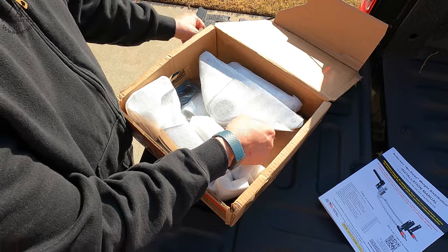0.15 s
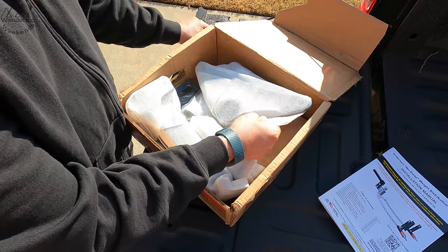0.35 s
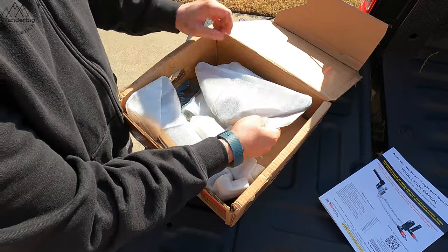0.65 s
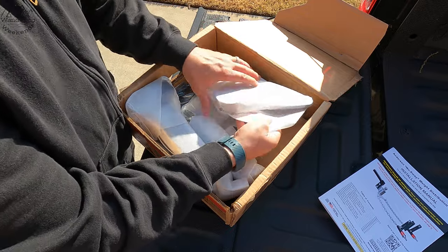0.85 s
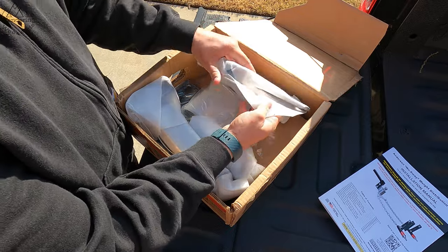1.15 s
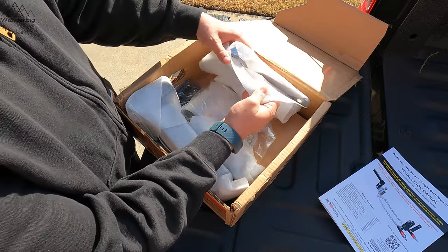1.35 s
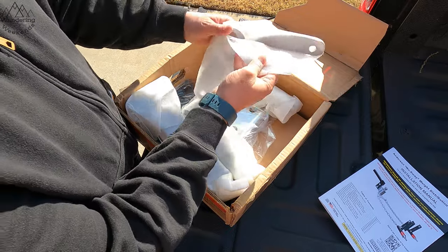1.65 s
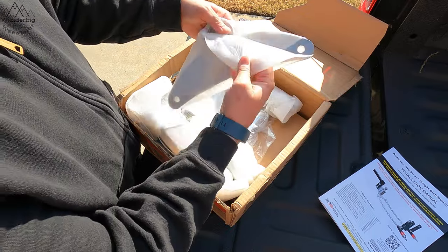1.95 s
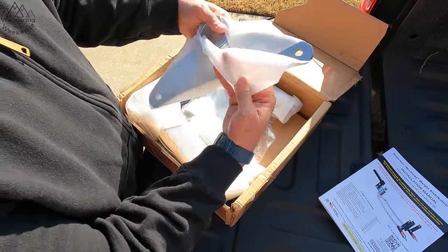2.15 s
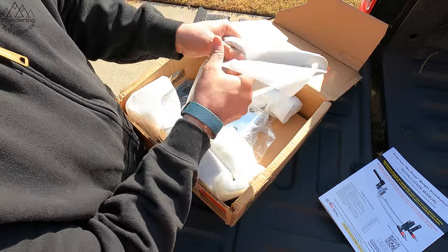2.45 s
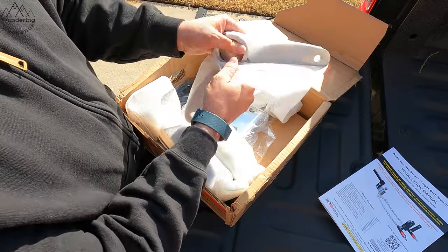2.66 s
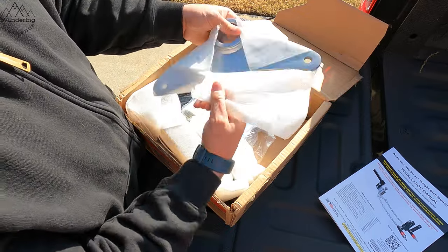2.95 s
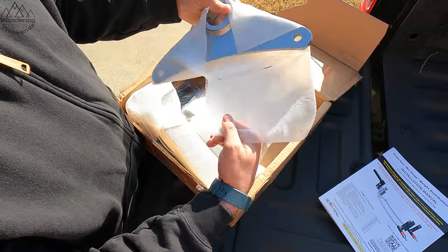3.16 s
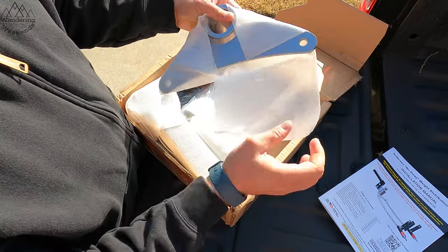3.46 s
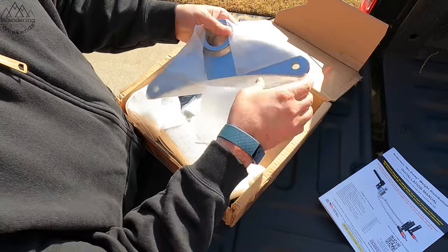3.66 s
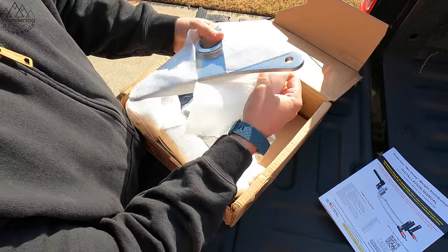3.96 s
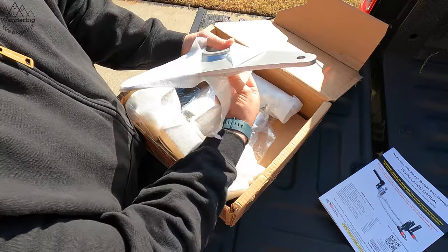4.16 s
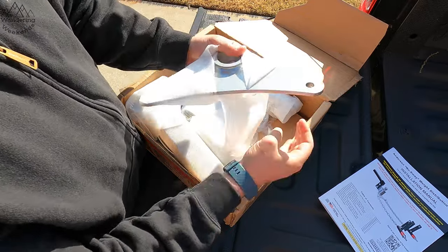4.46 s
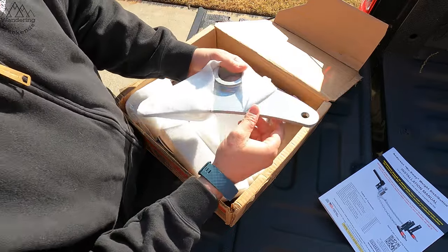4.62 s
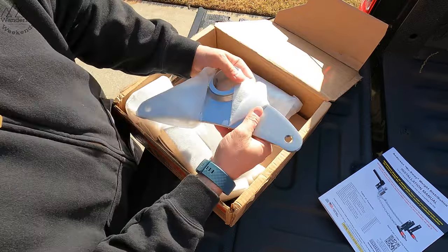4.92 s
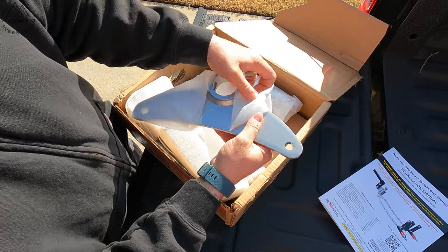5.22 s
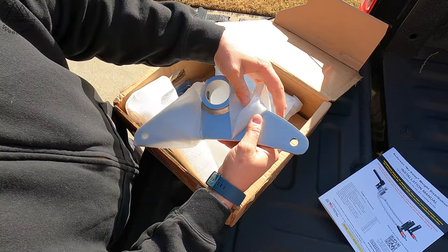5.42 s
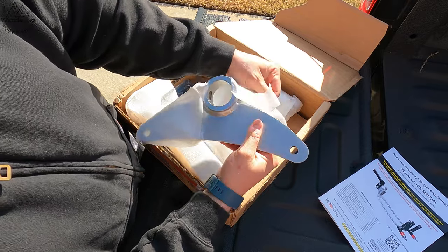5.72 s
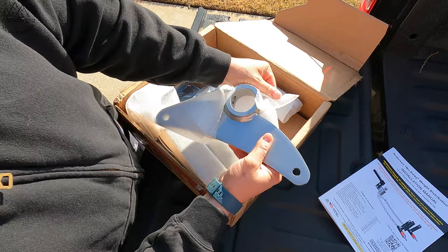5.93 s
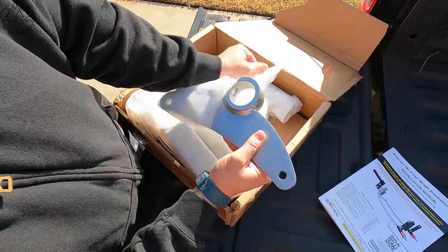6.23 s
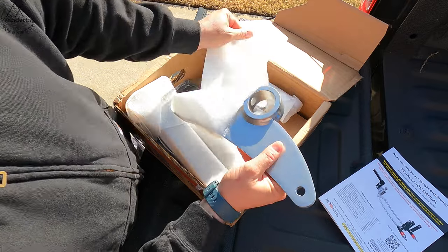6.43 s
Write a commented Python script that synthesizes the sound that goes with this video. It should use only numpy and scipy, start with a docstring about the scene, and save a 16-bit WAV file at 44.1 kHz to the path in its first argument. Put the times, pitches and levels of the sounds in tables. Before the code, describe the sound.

Close, dry crinkling of packing sheet, sharp little snaps and short scraping pulls, a few dull box bumps, faint outdoor air beneath.

```python
"""Unwrapping a steel bracket

Hands lift a steel bracket out of a cardboard box outdoors and peel off its thin packing wrap, up close.
Creases snap as single pulses, pulls are stick-slip pulse trains, and sparser noise rustles in between.
The box thumps in damped modes, the crackle faintly rings the steel, and shaped noise is the moving air.
A camera microphone colours it all and adds a short hollow doubling."""
import sys
import numpy as np
from scipy import signal
from scipy.fft import rfft, irfft, next_fast_len
from scipy.io import wavfile
from scipy.ndimage import uniform_filter1d, minimum_filter1d, map_coordinates

SR = 44100
rng = np.random.default_rng(int(sys.argv[2]) if len(sys.argv) > 2 else 0)


def generate_wav(sig):
    """Save sig (samples, or channels by samples) to the path in sys.argv[1] as 16-bit PCM at SR."""
    pcm = np.round(np.clip(np.atleast_2d(sig).T, -1, 1) * 32767).astype(np.int16)
    wavfile.write(sys.argv[1], SR, pcm)


N = 290442  # length in samples

# a crease strains just before it buckles: lead time, and level against the pop's sharp pulse
STRAIN_S, STRAIN_DB = 0.0034, -18.5

# the loudest creases popping; levels are relative
# columns: start_s [s], level_db [dB], fold_hz [Hz]
CREASE_SNAPS = [(0.088, -25.5, 2150), (0.2168, -23, 2870), (0.392, -26.5, 2420), (.48, -28.5, 2770),
                (0.7823, -27.5, 1560), (0.8429, -21.5, 3080), (0.8695, -30, 2830), (0.8832, -28, 3070),
                (0.9808, -24.5, 2620), (.9988, -22, 2240), (1.0057, -19.5, 2400), (1.1144, -22, 2180),
                (1.1432, -26, 1560), (1.161, -29.5, 1820), (1.208, -28.5, 2940), (1.4645, -17, 3750),
                (1.51, -32.5, 1780), (1.676, -22.5, 2470), (1.7206, -19, 2410), (1.7738, -29.5, 1770),
                (1.8261, -27, 2620), (1.872, -26, 1440), (1.896, -23.5, 1640), (1.917, -19.5, 1940),
                (2.0217, -18.5, 2970), (2.051, -23, 1700), (2.0739, -24.5, 1560), (2.0948, -14.5, 1580),
                (2.143, -16.5, 1500), (2.161, -23.5, 2360), (2.215, -28, 1790), (2.343, -24.5, 1630),
                (2.598, -18.5, 1790), (2.67, -34.5, 1790), (2.791, -26, 2390), (2.833, -27, 1880),
                (2.936, -19, 2060), (3.039, -17.5, 1930), (3.1042, -24, 2800), (3.181, -19, 2740),
                (3.29, -36.5, 2610), (3.3479, -20, 2280), (3.381, -24.5, 1970), (3.4138, -28.5, 1930),
                (3.452, -23, 2250), (3.538, -26, 2200), (3.555, -21.5, 2790), (3.7737, -31.5, 2320),
                (3.8367, -19.5, 2180), (3.8844, -37, 1570), (3.908, -24.5, 2150), (3.9444, -24, 2320),
                (3.957, -24, 3000), (3.9879, -21.5, 2690), (4.041, -23.5, 4230), (4.0541, -21, 2330),
                (4.196, -22, 1680), (4.211, -19, 1650), (4.309, -21.5, 1950), (4.3656, -31.5, 3370),
                (4.487, -28, 2470), (4.543, -28, 3420), (4.705, -26.5, 3000), (4.7216, -27, 1800),
                (4.7328, -35, 2920), (4.7577, -22.5, 2900), (4.784, -27, 2600), (4.7987, -23, 2760),
                (4.851, -25, 2550), (4.9717, -24, 3150), (5.0265, -30.5, 3770), (5.081, -36, 2160),
                (5.104, -26, 2120), (5.123, -20.5, 2500), (5.238, -29.5, 2730), (5.2524, -34, 1960),
                (5.3777, -22, 2720), (5.565, -32.5, 2110), (5.6574, -24, 2120), (5.6864, -11.5, 3040),
                (5.705, -22.5, 2810), (5.734, -21, 3400), (5.7547, -23, 3400), (5.7645, -21, 3520),
                (5.7987, -17.5, 3200), (5.929, -18, 2620), (5.947, -21, 2296), (5.978, -21.5, 1580),
                (6.1146, -11.5, 1790), (6.257, -24.5, 2010), (6.3394, -16, 1900), (6.402, -22, 2270),
                (6.4496, -14.5, 3430), (6.579, -29, 2130)]


def snaps():
    """The big creases give way one by one."""
    track = np.zeros(N)
    for start_s, level_db, fold_hz in CREASE_SNAPS:
        add(track, start_s - STRAIN_S, pop(level_db, fold_hz))
    return track


def pop(level_db, fold_hz, body_db=-16.5, body_scatter_db=2.0, size=2048):
    """A crease buckles in one pulse, and the sheet around it shivers briefly."""
    buckle = amp(-2.5) * dying_noise(0.017, size)
    buckle[0] += 1
    strain = rng.standard_normal(round(STRAIN_S * SR))
    strain *= amp(STRAIN_DB) / np.linalg.norm(strain)
    push = np.concatenate([strain, buckle])
    shaped = np.convolve(push, facets(1, depth_db=3.0)[0])
    this_body_db = rng.normal(body_db, body_scatter_db)
    sound = sheet(shaped, fold_hz, q=2.2, body_db=this_body_db, hiss_db=-20.5)
    return amp(level_db + 20.5) * sound / np.linalg.norm(sound)


# a tauter sheet has less body and a sharper fold: Q at ordinary slack, the body level there,
# and how many dB less body doubles the Q
FOLD_Q, SLACK_DB, DB_PER_Q_DOUBLING = 1.93, -13, 20.5

# pulls on the wrap; swell is the level change from start to end, slips_per_s a nominal rate,
# body and hiss are the sheet's low and high bands against the fold
# columns: start_s [s], end_s [s], level_db [dB], swell_db [dB], slips_per_s [1/s], fold_hz [Hz],
# body_db [dB], hiss_db [dB]
WRAP_PULLS = [(0.023, 0.035, -38, 8, 245, 1500, 0, -19), (0.052, 0.093, -33, 7, 600, 2220, -1, -36),
              (0.211, 0.247, -28, 5, 270, 2920, -1, -9.5), (.246, .342, -33.5, -4, 300, 3900, 2, -12.5),
              (0.339, 0.413, -28, 1, 600, 2860, 5, -8.5), (0.413, .464, -30.5, -8, 590, 1120, -3, -11),
              (.95, 1.0, -34.5, 2, 180, 1800, -6, -4), (0.999, 1.074, -31, -10, 160, 2400, -9, -15),
              (1.144, 1.252, -36.5, 1, 160, 2460, -9, -5.5), (1.343, 1.425, -36.5, -1, 330, 1880, -12, 3),
              (1.425, 1.471, -24, 1.5, 308, 1610, -3, -6), (1.546, 1.642, -32.5, 9, 290, 1640, -6, -8.5),
              (1.663, 1.693, -32.5, 6, 410, 1900, 2, -1), (1.82, 1.832, -24, -13, 520, 2337, -1.5, -10),
              (1.88, 1.955, -31, -11, 158, 1880, -14, -2), (2.058, 2.115, -26, -6, 500, 1560, -6.5, -18),
              (2.116, 2.187, -32, -5, 430, 1840, 1.5, -8), (2.345, 2.421, -32, 19, 386, 2080, -12, -9.5),
              (2.789, 2.82, -24.5, -4, 190, 2300, -30, -16), (2.814, 2.851, -23, 0, 155, 1920, -34, -18),
              (2.849, 2.953, -23, -8.5, 200, 1830, -30, -18),
              (3.004, 3.064, -27.5, 1, 800, 1937, -8, -12.5), (3.064, 3.129, -31.5, 2, 226, 2520, -3, -11),
              (3.125, 3.203, -28.5, -4, 400, 2480, -4.5, -15),
              (3.314, 3.466, -36, 5, 137, 2540, -21, -15.5), (3.815, 3.845, -30.5, 3, 270, 2127, 1.5, -17),
              (3.881, 3.918, -35.5, -11, 145, 1890, 2, -37), (3.942, 4.006, -33.5, 12, 167, 2504, 6.5, -37),
              (4.021, 4.113, -29.5, 11.5, 165, 2280, -2, -38),
              (4.11, 4.169, -22.5, 3, 1080, 1570, -17, -11.5),
              (4.198, 4.254, -22.5, 3, 390, 1680, -10.5, -8.5),
              (4.261, 4.292, -21, -11, 1550, 1910, -25, -16.5), (4.281, 4.326, -31, -7, 510, 1560, -15, -8),
              (4.427, 4.458, -28, 0, 440, 2210, -19, -10), (4.476, 4.493, -30, -1, 600, 2360, 3, -15),
              (4.51, 4.585, -34, 6, 121, 2070, -3, -11), (4.703, 4.729, -34, 5, 110, 2420, -14, -2),
              (4.852, 4.86, -28.5, -20, 550, 2200, -10, -20),
              (5.313, 5.357, -34.5, -2, 1700, 2120, -6.5, -18), (5.314, 5.35, -38, -1, 1200, 890, -23, -38),
              (5.359, 5.435, -36.5, 11, 270, 2140, -4, -12), (5.444, 5.457, -27, 10, 720, 2750, -0.5, -12),
              (5.618, 5.69, -37, -7, 207, 2560, -4.5, -14), (5.688, 5.777, -27.5, 4, 123, 3130, -24, -15),
              (5.777, 5.846, -26, 5, 420, 2190, -10, -26), (5.886, 5.921, -25, 1, 550, 1750, -11, -11),
              (5.915, 5.95, -34, -5, 700, 980, -18, -23), (5.928, 6.014, -28.5, -6.5, 143, 1750, -11, -19),
              (6.116, 6.13, -24.5, 11, 510, 1758, -9, -10), (6.14, 6.174, -32, -10, 510, 1900, -24, -11.5),
              (6.26, 6.319, -32, 19, 335, 1770, -11, -9), (6.318, 6.344, -23.5, -1, 444, 2246, -6.5, -10.5),
              (6.349, 6.401, -26, 6, 760, 1880, -3.5, -12.5), (6.394, 6.452, -21, 1, 1470, 2662, -7.5, -22),
              (6.471, 6.523, -33.5, 13, 157, 2250, -21, -13.5)]


def strokes(drift=0.015):
    """The wrap catches and slips over steel and fingers, with a smooth rub underneath."""
    track = np.zeros(N)
    for start_s, end_s, level_db, swell_db, slips_per_s, fold_hz, body_db, hiss_db in WRAP_PULLS:
        q = FOLD_Q * 2 ** ((SLACK_DB - body_db) / DB_PER_Q_DOUBLING)
        n = max(int((end_s - start_s) * SR), SR // 200)
        way = np.linspace(0, 1, n)
        pressure = amp(swell_db * (way - 0.5)) * signal.windows.tukey(n, 0.12)
        smooth_rub = amp(-4) * rng.standard_normal(n)
        push = (slips(slips_per_s, n) + smooth_rub) * pressure
        # the fold travels as the sheet is drawn: crossfade between two pitches, up or down
        glide = np.exp(drift * rng.choice([-1, 1]))
        sound = np.zeros(2 * n)  # the second half leaves room to ring out
        for share, hz in [(1 - way, fold_hz / glide), (way, fold_hz * glide)]:
            sound += sheet(np.pad(push * share, (0, n)), hz, q, body_db, hiss_db)
        add(track, start_s, amp(level_db - 2.0) * sound * np.sqrt(n) / np.linalg.norm(sound))
    return track


def slips(rate, size, jitter=0.3, scatter_db=3.0):
    """Uneven stick-slip pulses of rms 1, each from another facet of the sheet."""
    count = int(1.5 * rate * size / SR) + 4
    gaps = np.exp(jitter * rng.standard_normal(count)) * SR / rate
    at = (np.cumsum(gaps) - gaps[0] * rng.uniform(0.5, 1)).astype(int)
    strength = amp(scatter_db * rng.standard_normal((count, 1)))
    polarity = rng.choice([-1, 1], (count, 1))
    pulses = facets(count, depth_db=6.5) * strength * polarity
    where = at[:, None] + np.arange(pulses.shape[1])
    return unit(np.bincount(where.ravel(), pulses.ravel(), size)[:size])


# small creases during a pull: nominal rate, level over the pull, random spread
CREASES_PER_S, CREASE_DB, CREASE_SCATTER_DB = 25, 0, 4


def creases(pitch_spread=0.13):
    """Small creases pop at random while the sheet is pulled, near the pitch of the moving fold."""
    track = np.zeros(N)
    for start_s, end_s, pull_db, swell_db, _, fold_hz, *_ in WRAP_PULLS:
        length_s = end_s - start_s
        count = int(length_s * CREASES_PER_S)
        for way in (np.arange(count) + rng.random(count)) / max(count, 1):
            scatter_db = CREASE_SCATTER_DB * rng.standard_normal()
            level_db = pull_db + swell_db * (way - 0.5) + CREASE_DB + scatter_db
            hz = fold_hz * np.exp(pitch_spread * rng.standard_normal())
            add(track, start_s + way * length_s - STRAIN_S, pop(level_db, hz))
    return track


# the hardest creases crack with a thin, very high tick; levels are relative
# columns: start_s [s], level_db [dB]
CREASE_CRACKS = [(2.0225, -23), (5.7362, -42), (6.117, -51)]


def cracks(hz=15000):
    """A taut crease gives way all at once and spits a moment of top treble."""
    track = np.zeros(N)
    for start_s, level_db in CREASE_CRACKS:
        tick = filtered(dying_noise(0.02, size=1024), lambda f: mode(f, hz, 1.9) ** 2)
        add(track, start_s, amp(level_db + 15) * tick / np.abs(tick).max())
    return track


def rustle():
    """Tiny wrinkles let go in clumps while the sheet hangs loose."""
    wrinkles = slips(700, N, jitter=0.8, scatter_db=4)
    brush = amp(-7.5) * rng.standard_normal(N)
    clumps = amp(1.93 * wobble(45))
    push = (wrinkles + brush) * clumps
    return unrest() * unit(sheet(push, 1850, q=0.88, body_db=-6.5, hiss_db=-9.5))


# the loose sheet: steady level, stir after a pull against that pull, time for the stir to fall to 1/e
RUSTLE_DB, AFTER_PULL_DB, SETTLE_S = -43.5, -13.5, 0.037
PAUSE_FADE_S = 0.042

# the hands rest and the rustle dies down
# columns: start_s [s], end_s [s], dip_db [dB]
HAND_PAUSES = [(0.655, 0.756, -8.5), (2.19, 2.314, -6.5), (2.497, 2.676, -4), (3.19, 3.293, -8.5),
               (3.53, 3.946, -12.5), (4.51, 4.627, -10), (5.21, 5.284, -2), (5.465, 5.56, -11.5),
               (6.001, 6.127, -9)]


def unrest():
    """How much the loose sheet moves: steadily, more with each pull, less while the hands rest."""
    t, pulls, total_dip_db = np.arange(N) / SR, np.zeros(N), np.zeros(N)
    for start_s, end_s, level_db, *_ in WRAP_PULLS:
        settling = np.exp(-np.maximum(t - end_s, 0) / SETTLE_S)
        pulls = np.maximum(pulls, amp(level_db) * (t > start_s) * settling)
    for start_s, end_s, dip_db in HAND_PAUSES:
        inside_s = np.minimum(t - start_s, end_s - t)
        total_dip_db += dip_db * np.clip(inside_s / PAUSE_FADE_S + 0.5, 0, 1)
    return np.hypot(amp(RUSTLE_DB), amp(AFTER_PULL_DB) * pulls) * amp(total_dip_db)


def sheet(push, fold_hz, q, body_db, hiss_db,
          body_hz=430, hiss_hz=5000, body_q=1.02, hiss_q=0.6, skirt_q=0.49):
    """The wrap radiates through its broad body, the steep-sided band of its moving fold, and fine wrinkles."""
    def response(f):
        body = amp(body_db) * mode(f, body_hz, body_q)
        fold = mode(f, fold_hz, q) * mode(f, fold_hz, skirt_q)
        wrinkles = amp(hiss_db) * mode(f, hiss_hz, hiss_q)
        return body - fold + wrinkles
    return filtered(push, response)


def facets(count, depth_db=4.5, size=128, order=26):
    """Short pulses of energy 1: every crease has a shape, hence peaks and dips, of its own."""
    knots = rng.standard_normal((count, order))
    spectra_db = depth_db * signal.resample(knots, size // 2 + 1, axis=1)
    pulses = irfft(causal(amp(spectra_db)))
    return pulses / np.linalg.norm(pulses, axis=1, keepdims=True)


# bumps on the box and the taut sheet; hardness sets the share of panel ring and scuff
# columns: start_s [s], level_db [dB, relative], hardness_db [dB], boom_hz [Hz]
BOX_BUMPS = [(.215, -28, 9, 253), (.415, -14, 3, 251), (.436, -16, -15, 217), (.45, -17.5, 1.5, 241),
             (.483, -29, -1, 294), (0.529, -24, 12.5, 280), (.54, -8.5, -19, 242), (0.547, -14.5, -16, 240),
             (.567, -11, 3, 258), (.579, -9, -3, 239), (.596, -10, -9, 256), (0.627, -18.5, -3, 238),
             (.647, -17, -6, 263), (.675, -21.5, -4.5, 256), (1.161, -36.5, 13, 283), (1.826, -39, 16, 302),
             (2.097, -17.5, 3, 306), (2.128, -26, -12, 260), (2.163, -19.5, -13, 273),
             (2.344, -29.5, -22, 299), (2.938, -28, 1, 314), (3.074, -25.5, -11, 322),
             (3.144, -24.5, -5, 318), (3.439, -28.5, -5, 209), (3.777, -33.5, 8, 253),
             (3.837, -22.5, -4, 322), (4.055, -23.5, 12.5, 248), (4.208, -25.5, -14, 262.5),
             (5.453, -21, -1, 217), (5.93, -21, -12, 327), (6.431, -24, -10, 301),
             (6.448, -23.5, -16, 210.5), (6.509, -30, 2, 280)]
# modes of the cardboard panels
# columns: pitch_hz [Hz], level_db [dB, relative], t60_s [s]
CARDBOARD_MODES = [(478, -12, 0.082), (540, 1.5, 0.041), (896, -6, 0.062), (1030, -26, .04)]


def bumps(cut_hz=140, spread=1.355):
    """Soft blows boom in a few close modes; harder ones also wake the cardboard's panels and scuff it."""
    track = np.zeros(N)
    for start_s, level_db, hardness_db, hz in BOX_BUMPS:
        boom = ring([(hz / spread, -7, 0.06), (hz, 0, 0.08), (hz * spread, -6, 0.05)])
        panels = amp(hardness_db - 11.0) * ring(CARDBOARD_MODES)
        scrape = dying_noise(0.15, size=len(boom))
        scuff = filtered(scrape, lambda f: mode(f, 530, 0.79) * mode(f, 540, 0.8))
        add(track, start_s, amp(level_db - 2.5) * (boom + panels + amp(hardness_db + 25.5) * scuff))
    # a small box cannot radiate deep bass
    return signal.sosfilt(signal.butter(3, cut_hz, "highpass", fs=SR, output="sos"), track)


# modes of the bracket, damped by the grip
# columns: pitch_hz [Hz], level_db [dB, relative], t60_s [s]
STEEL_MODES = [(1690, -14, .3), (2130, 30, 0.13), (3230, 11, 0.029), (4130, 36, 0.26), (5060, -33, .22)]


def bracket(wrap):
    """The crackle faintly rings the steel that it is wrapped around."""
    steel = ring(STEEL_MODES)
    return amp(-22.0) * signal.fftconvolve(wrap, steel / np.linalg.norm(steel))[:N]


def surroundings(x, size=9000):
    """Box, body and truck bed scatter a short tail, drawn afresh every quarter second."""
    track, block = np.zeros(N), SR // 4
    for i in range(0, N, block):
        tail = amp(-13.5) * dying_noise(0.059, size) + amp(-17.0) * dying_noise(0.13, size)
        add(track, i / SR + 0.003, signal.fftconvolve(x[i:i + block], tail))
    return track


# air at the microphone, rising and falling
# columns: time_s [s], level_db [dB, relative]
AIR_LEVEL = [(0.0, -57.5), (0.58, -51), (0.95, -63.5), (1.47, -53), (1.74, -68.5), (1.98, -62), (2.49, -78),
             (2.88, -64), (3.36, -64), (3.8, -54.5), (3.89, -60), (4.55, -81), (4.58, -64), (4.86, -70),
             (6.07, -58), (6.27, -79), (6.46, -61), (6.59, -74)]
# spectrum of the air rumble
# columns: frequency_hz [Hz], level_db [dB, relative]
RUMBLE_SPECTRUM = [(20, -20), (60, -2.5), (110, 1.5), (190, 1), (280, 0.5), (450, -10), (1000, -52)]
# spectrum of the quiet outdoor hiss
# columns: frequency_hz [Hz], level_db [dB, relative]
OUTDOOR_SPECTRUM = [(30, -11), (300, 6.5), (1000, 6), (4000, -34), (16000, 5.5)]


def air():
    """A light, uneven rumble over the quiet outdoor hiss, both shaped from white noise."""
    def noise(spectrum):
        return unit(filtered(rng.standard_normal(N), lambda f: amp(along(spectrum, f))))
    gusts = amp(curve(AIR_LEVEL) + 8.5 + 2.6 * wobble(12.0))
    return gusts * noise(RUMBLE_SPECTRUM) + amp(-54.5) * noise(OUTDOOR_SPECTRUM)


def amp(db):
    """Decibels to linear gain."""
    return 10 ** (np.asarray(db) / 20)


def unit(x):
    """Scale to rms 1."""
    return x / np.sqrt(np.mean(x ** 2) + 1e-20)


def along(points, hz):
    """Read (Hz, value) points on a log frequency axis."""
    f, v = np.transpose(points)
    return np.interp(np.log(hz + 1), np.log(f), v)


def curve(rows):
    """One value per sample from (s, value) rows."""
    return np.interp(np.arange(N) / SR, *np.transpose(rows))


def wobble(rate):
    """A smooth random curve, rate knots a second."""
    knots = rng.standard_normal(int(N * rate / SR) + 4)
    return map_coordinates(knots, [np.arange(N) * rate / SR])


def add(track, s, sound):
    """Mix a sound into the track at s seconds."""
    place = track[max(round(s * SR), 0):][:len(sound)]
    place += sound[:len(place)]


def filtered(x, response):
    """Shape x by a complex response of frequency, padded against wrap-around."""
    n = x.shape[-1]
    m = 2 * next_fast_len(n + SR // 20)
    return irfft(rfft(x, m) * response(np.fft.rfftfreq(m, 1 / SR)), m)[..., :n]


def causal(gain):
    """The minimum-phase response with this gain, along the last axis."""
    cepstrum = irfft(np.log(gain))
    half = cepstrum.shape[-1] // 2
    cepstrum[..., 1:half] *= 2
    cepstrum[..., half + 1:] = 0
    return np.exp(rfft(cepstrum))


def mode(f, hz, q):
    """One resonance, gain 1 at its centre."""
    damping = 1j * f * hz / q
    return damping / (hz * hz - f * f + damping)


def dying_noise(t60, size):
    """A decaying burst of noise with energy 1."""
    burst = rng.standard_normal(size) * amp(-60 * np.arange(size) / SR / t60)
    return burst / np.linalg.norm(burst)


def ring(modes, size=12000):
    """Damped modes, each hit with slightly fresh strength and pitch, peak 1."""
    t = np.arange(size) / SR
    sound = np.zeros(size)
    for hz, level_db, t60 in modes:
        decay = amp(level_db + rng.normal(0, 0.31) - 60 * t / t60)
        sound += decay * np.sin(2 * np.pi * hz * rng.normal(1, 0.0019) * t)
    return sound / np.abs(sound).max()


def sparkle(pair, edge_hz=9000, depth_db=2.5):
    """The top treble flickers, differently at each ear."""
    top = filtered(pair, lambda f: f > edge_hz)
    flicker = unit(amp(depth_db * np.array([wobble(170), wobble(170)])))
    return pair + top * (flicker - 1)


# stereo width of the scattered sound
# columns: frequency_hz [Hz], side_over_mid_db [dB]
STEREO_WIDTH = [(30, -3), (150, -28.5), (3000, -35), (6500, -22), (8000, -16), (9500, -28), (13000, -3)]


def scene():
    """All sources lie straight ahead; a scattered side signal widens them, mostly in the bass and top."""
    wrap = snaps() + creases() + cracks() + strokes() + rustle()
    direct = wrap + bumps()
    mid = direct + bracket(wrap) + surroundings(direct) + air()
    scattered = signal.fftconvolve(mid, dying_noise(0.013, size=1024))[:N]
    side = filtered(scattered, lambda f: amp(along(STEREO_WIDTH, f)))
    return sparkle(np.array([mid + side, mid - side]))


# the doubling: delay, and the frequency it reaches up to; then the upper limit of the whole sound
DOUBLE_S, DOUBLE_TOP_HZ, TOP_HZ = 0.003764, 8300, 16500

# microphone colour
# columns: frequency_hz [Hz], gain_db [dB]
MIC_COLOUR = [(30, -1.5), (4500, -0.5), (6000, -5.5), (7500, -9.5), (9000, -22.5), (9700, -14),
              (11500, -6.5), (12500, -9), (13000, -23), (15000, -25), (16500, -48)]


def record(dry, double_db=-4.5, ceiling=0.33):
    """The camera colours the sound, doubles it with a fixed short delay (a hollow comb), rounds off peaks."""
    def camera(f):
        delayed = np.exp(-2j * np.pi * f * DOUBLE_S)
        comb = 1 + amp(double_db) * (f < DOUBLE_TOP_HZ) * delayed
        return causal(amp(along(MIC_COLOUR, f))) * comb
    x = filtered(dry, camera)
    # one smoothed gain for both channels ducks whatever passes the ceiling
    needed = 1 / np.maximum(np.abs(x).max(axis=0) / ceiling, 1)
    gain = uniform_filter1d(minimum_filter1d(needed, size=65), size=65)
    return filtered(x * gain, lambda f: f < TOP_HZ)


dry = scene()
out = record(dry)
generate_wav(out)
```